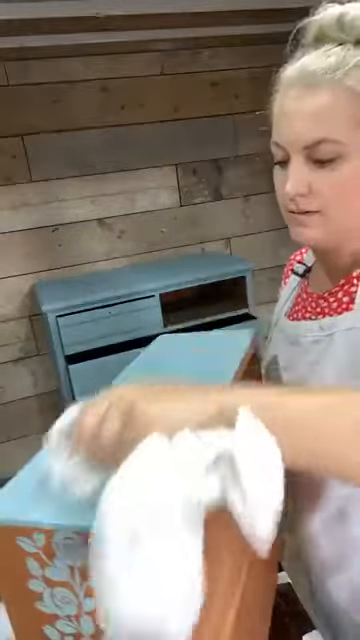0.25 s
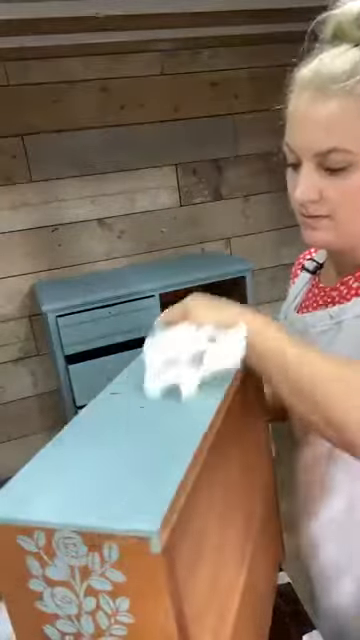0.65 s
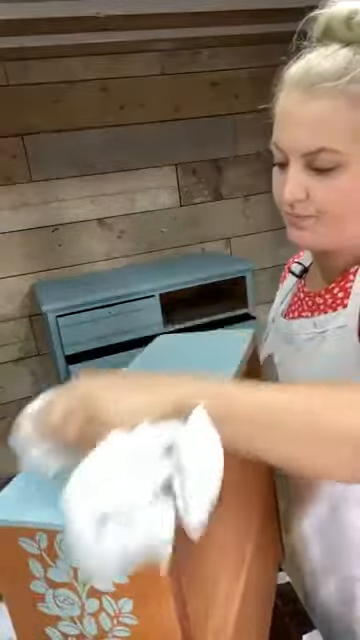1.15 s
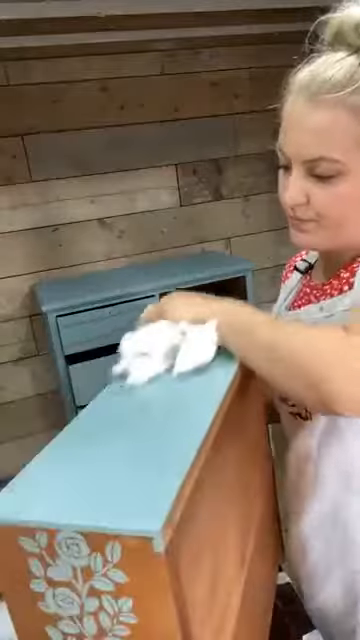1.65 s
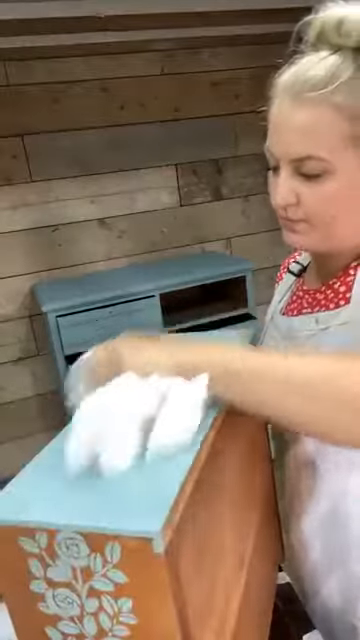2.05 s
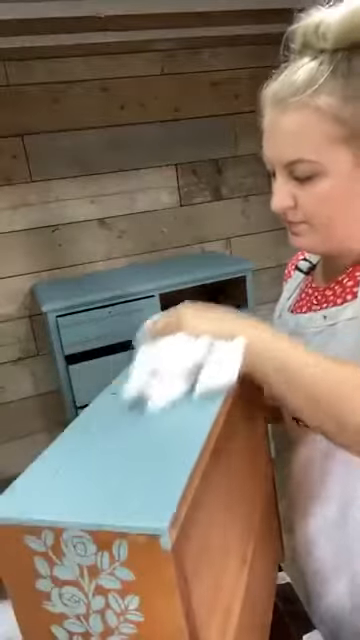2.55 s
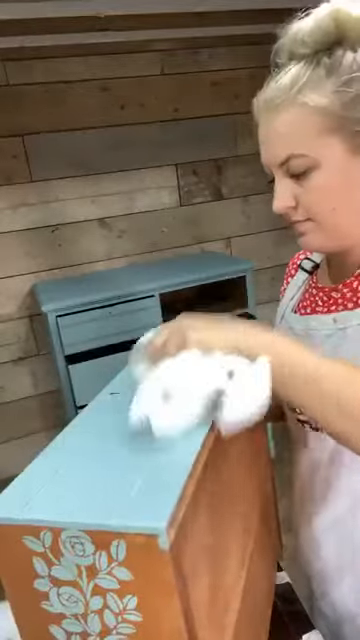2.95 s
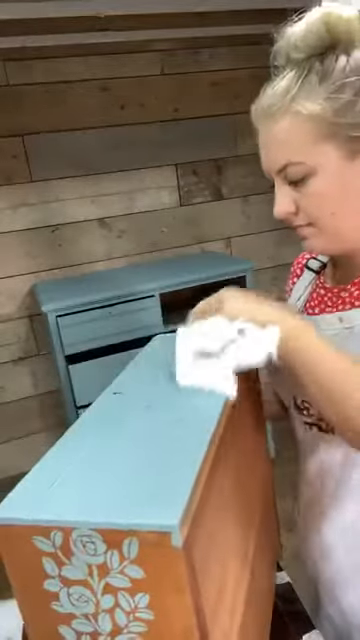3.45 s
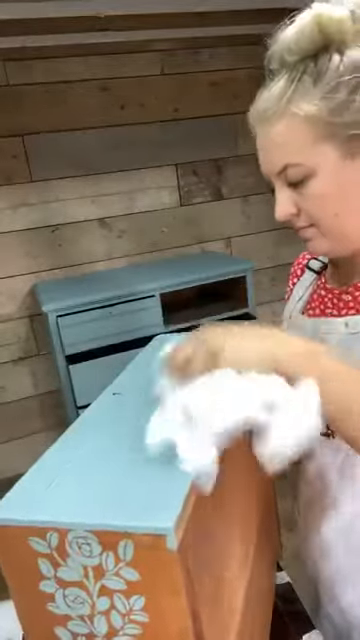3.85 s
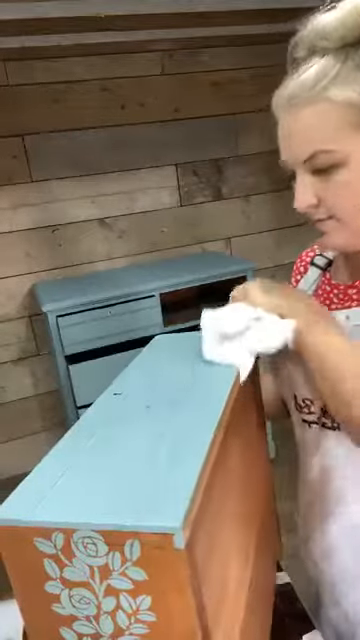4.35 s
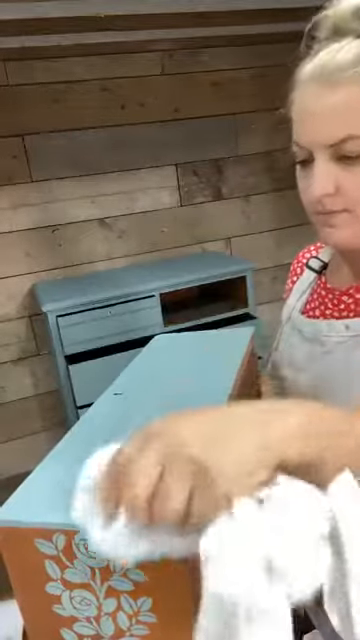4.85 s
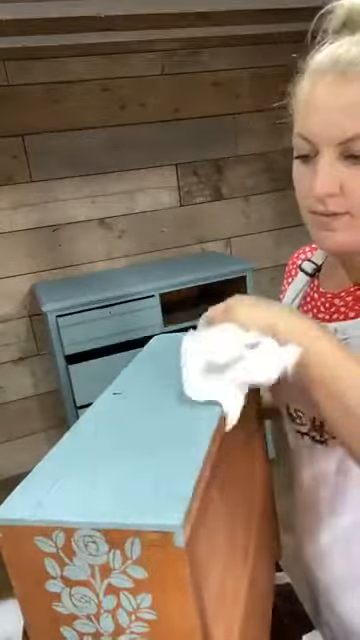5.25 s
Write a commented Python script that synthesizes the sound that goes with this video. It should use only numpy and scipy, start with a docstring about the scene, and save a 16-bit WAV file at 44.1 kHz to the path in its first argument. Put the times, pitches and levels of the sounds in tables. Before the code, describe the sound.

Dry, swishing strokes of a cloth buff a waxed piece of wooden furniture, two or three strokes a second, with a few tiny rasps and low groans. Hard pushes make the piece bump and knock roughly every second at first; later the knocks are barely there and a faint low rumble swells near the end. A single microphone picks it up in a small, quiet room.

```python
"""A cotton cloth is rubbed briskly to and fro over the waxed front of a wooden drawer on a table in a
small room. From the start the fibres hiss, coloured by the hollow under the hand, whose pitch rises and
sinks with each stroke. For four seconds, hard pushes rock the drawer about once a second: it thumps on
the table and drops back with a knock. Now and then the cloth snags or groans on the wax. After that the
knocks are faint, and near the end a low rumble swells. One microphone hears it all."""
import sys
import numpy as np
from scipy import signal
from scipy.fft import rfft, irfft
from scipy.io import wavfile
from scipy.ndimage import uniform_filter1d

SR = 44100
rng = np.random.default_rng(int(sys.argv[2]) if len(sys.argv) > 2 else 0)


def store_wav(level_fs):
    """Save 16-bit WAV to argv[1]."""
    pcm = np.round(np.clip(np.atleast_2d(level_fs), -1, 1) * 32767)
    wavfile.write(sys.argv[1], SR, pcm.T.astype(np.int16))


N = 242936
TIME = np.arange(N) / SR

# The hand's strokes, pull and push in turn. The crest is the highest pitch of the hollow under the hand.
# (moment of grip [s], speeding up [s], slowing down [s], hiss [dB], treble [dB], hand's weight [dB],
#  crest [Hz], time from the turn to the crest [s], hollow's strength at the crest [dB], grip [dB])
HAND_STROKES = [(0.02, 0.013, 0.21, -52.5, -2.5, 3, 3350, 0.14, 4, -49),
                (0.137, 0.29, 0.23, -44.5, -0.5, -1, 3470, 0.19, -2.5, -34),
                (.604, 0.072, 0.4, -43, 0, 3, 4120, 0.13, 1, -52.5),
                (1.074, 0.28, 0.22, -43.5, -0.5, 0, 3853, 0.19, -3, -47.5),
                (1.535, 0.086, 0.43, -44.2, 0.5, 0, 3700, 0.15, 1.5, -50.5),
                (2.05, 0.27, 0.26, -44.5, -2, 0, 3880, 0.2, -3.5, -57.5),
                (2.491, 0.13, 0.36, -43.5, 0, 1.5, 3870, 0.2, 1, -53),
                (2.963, 0.29, 0.17, -45, -1, -2.5, 3400, .21, -2, -39.5),
                (3.342, .11, 0.38, -44.5, 2, -0.5, 3300, 0.15, -2.5, -48),
                (3.823, 0.25, 0.17, -46.5, -2, -4, 3540, .21, -1, -41.5),
                (4.169, 0.091, .37, -46.5, 1, -4.5, 3200, .15, -2.5, -45),
                (4.615, 0.25, 0.34, -44.5, 0, -6.5, 4200, 0.2, -5, -57.5),
                (5.142, 0.14, 0.21, -44.5, 3, -1.5, 4220, 0.16, 0.5, -57),
                (5.469, 0.27, .19, -42.5, -2, -1.5, 3500, .18, -2, -65.5)]
# The tones that drawer and table ring with: (pitch [Hz], level [dB], time to fade by 60 dB [s])
WOOD_TONES = [(85.5, -17, 0.15), (147, -16, 0.11), (183.4, -8.5, 0.16), (240.4, 1.5, 0.093),
              (281.5, -5, 0.12), (310, -6.5, 0.072), (430, -18, 0.025), (490, -1.5, 0.043),
              (547.3, 5.5, 0.039), (632, -0.5, 0.053), (695, 5.5, 0.057), (804, -7.5, 0.022),
              (833, -10.5, 0.06), (1000, 4, 0.064), (1037, -12, 0.25), (1250, -1, 0.052),
              (1410, -4.5, 0.031), (1900, 4, 0.018), (2170, 3, 0.017), (2820, 3, 0.023)]


def strokes(stop_s=0.086, rest_db=-72, treble_fade_db_per_s=8, closing_db_per_s=12.5,
            hollow_rest_hz=926, hollow_rise_s=0.16, hollow_sink_s=0.1454):
    """The hand swings to and fro, setting the cloth's loudness and tone at every sample."""
    # How steeply the hiss follows the hand's speed, for a pull and then a push:
    # (time from the turn to the grip [s], exponent while speeding up, exponent while slowing down)
    swings = [(.029, 2.37, 1.38), (.038, 1.115, 2.86)]
    total_power, tone_sum = 1e-16, 0
    for k, stroke in enumerate(HAND_STROKES):
        grip_s, rise_s, fall_s, hiss_db, treble_db, weight_db, crest_hz, crest_s, hollow_db, _ = stroke
        grip_lag_s, speeding, slowing = swings[k % 2]
        length_s = rise_s + fall_s
        age = np.clip(TIME - grip_s + grip_lag_s, 0, length_s)
        sliding = np.clip((length_s - age) / stop_s, 0, 1)   # the cloth sticks fast at the end
        speed = np.sin(np.pi / 2 * np.interp(age, [0, rise_s, length_s], [0, 1, 0]))
        power = (from_db(hiss_db) * sliding * speed ** np.where(age < rise_s, speeding, slowing)) ** 2
        past_crest = age - crest_s
        glide_s = np.where(past_crest < 0, hollow_rise_s, hollow_sink_s)
        lift_hz = (crest_hz - hollow_rest_hz) * np.exp(-(past_crest / glide_s) ** 2)
        treble_db = treble_db - treble_fade_db_per_s * past_crest
        hollow_db = hollow_db + closing_db_per_s * past_crest   # the hollow closes along the stroke
        # where two strokes overlap, the louder one sets the tone
        tone_sum = tone_sum + power * np.array([treble_db, np.full(N, weight_db), lift_hz, hollow_db])
        total_power = total_power + power
    total_power = total_power + from_db(rest_db) ** 2
    treble_db, weight_db, lift_hz, hollow_db = tone_sum / total_power
    return 10 * np.log10(total_power), treble_db, weight_db, hollow_rest_hz + lift_hz, hollow_db


def cloth_hiss(hiss_db, treble_db, weight_db, hollow_hz, hollow_db, patchy_db=1.43, weave_db=0.42):
    """Countless fibres slip and hiss, duller as the hand slows; the hollow under the hand rings along."""
    # The tone of rubbing fibres: (frequency [Hz], level [dB])
    fibre_spectrum = [(120, -35.5), (350, -24), (700, -6), (1300, -3.5), (2200, -1.5), (4000, 0),
                      (6000, -2.5), (7700, -3), (8300, -7), (11000, -8.5), (13500, -26), (15000, -5)]
    darkening_db = 0.96 * np.clip(hiss_db.max() - hiss_db, 0, 12)
    hiss = 0
    for hz, band in noise_bands(100, size=N):
        low_share = np.clip(np.log2(3500 / hz) / 2, 0, 1)
        high_share = np.clip(np.log2(hz / 5500), 0, 1)
        colour_db = low_share * (darkening_db + weight_db) + high_share * treble_db
        hiss = hiss + band * from_db(at_hz(fibre_spectrum, hz) + colour_db + patchy_db * drift(10.4))
    hiss = hiss + hand_hollow(hollow_hz, hollow_db)
    # even out the bright part of the hiss, so that the stroke sets its loudness
    bright_power = uniform_filter1d(butter(hiss, [3000, 8000], "band") ** 2, size=4410)
    hiss = hiss / np.sqrt(bright_power)
    return hiss * from_db(hiss_db + weave_db * drift(150))   # the weave catches and lets go


def hand_hollow(pitch_hz, strength_db, boost_db=3.0, wobble=0.023):
    """The hollow under the hand rings with noise, louder and purer the better it is closed."""
    sharpness = 4.5 * np.sqrt(from_db(strength_db))
    noise = rng.standard_normal(N)
    wavering_hz = pitch_hz * np.exp(wobble * drift(10))
    return moving_resonance(noise, wavering_hz, sharpness) * from_db(boost_db + strength_db)


def contacts(usual_db=-47.5, usual_hz=460, usual_scuff_s=0.033, knock_scuff_s=0.0014):
    """List each grip of the hand and knock of the drawer as (time, level, brightness, scuff time)."""
    # The drawer bumps on the table: (time [s], level [dB], brightness [Hz])
    drawer_knocks = [(0.157, -38, 220), (0.195, -32.5, 1560), (1.114, -55, 250), (1.1375, -30.5, 2340),
                     (2.0899, -34.5, 2030), (2.979, -39.5, 220), (3.0211, -33, 970), (3.845, -32.5, 239),
                     (3.889, -37, 597), (4.674, -54, 1900), (5.212, -49.5, 280)]
    grips = []
    for s, *_, db in HAND_STROKES:
        harder_db = db - usual_db   # a harder grip is duller and shorter
        grips.append((s, db, usual_hz / 2 ** (harder_db / 14.5), usual_scuff_s / 2 ** (harder_db / 5)))
    return grips + [(s, db, hz, knock_scuff_s) for s, db, hz in drawer_knocks]


def wood_knocks(vary_db=0.5, detune=0.01, flip_chance=0.08, scuff_db=-28, size=22050):
    """Each blow is a click and a short scuff that ring the wood; the brighter the blow, the more of the high
    tones it wakes."""
    out = np.zeros(N + size)
    attack = TIME[:size] < 0.025   # a blow's level is that of its first moments
    for s, blow_db, contact_hz, scuff_s in contacts():
        scuff = from_db(scuff_db) * rng.standard_normal(size) * np.exp(-TIME[:size] / scuff_s)
        force = cross_panel(butter(signal.unit_impulse(size) + scuff, contact_hz, "low"))
        blow = np.zeros(size)
        for hz, db, fade_s in WOOD_TONES:
            # the spot that is hit sets each tone's strength and sign; the hand's load shifts its pitch
            strength = from_db(db + vary_db * rng.standard_normal())
            sign = np.sign(rng.random() - flip_chance)
            pitch_hz = hz * np.exp(detune * rng.standard_normal())
            blow += sign * strength * ring(force, pitch_hz, fade_s)
        start = round(s * SR)
        out[start:start + size] += from_db(blow_db) * blow / np.std(blow[attack])
    return out[:N]


def cross_panel(force, bass_delay_s=0.00892, corner_hz=380):
    """Low bending waves cross a wooden panel more slowly than high ones."""
    hz = np.arange(len(force) // 2 + 1) * SR / len(force)
    phase = 2 * np.pi * bass_delay_s * corner_hz * np.arctan(hz / corner_hz)
    return irfft(rfft(force) * np.exp(-1j * phase), len(force))


def wood_murmur(drag_db, offset_db=-17, contact_hz=550, uneven_db=2.5):
    """The dragging cloth keeps the drawer's low tones faintly ringing."""
    drag = butter(rng.standard_normal(N), contact_hz, "low", order=1)
    wood = sum(from_db(db) * ring(drag, hz, fade_s) for hz, db, fade_s in WOOD_TONES)
    return rms_one(wood) * from_db(drag_db + offset_db + uneven_db * drift(4.2))


def wax_groans(jitter=0.033, uneven_db=5.5, overtone_db=-14):
    """The cloth sticks and slips on the wax at a nearly steady rate, making brief low groans."""
    # Spells of sticking and slipping: (time [s], half length [s], slip rate [Hz], level [dB])
    groans = [(1.243, 0.013, 309, -42.5), (1.68, 0.037, 315, -54.5), (2.246, 0.057, 322, -58),
              (3.461, 0.045, 297.5, -56.5)]
    out = np.zeros(N)
    wander = np.exp(jitter * drift(31.7))
    for s, half_length_s, hz, db in groans:
        phase = 2 * np.pi * np.cumsum(hz * wander) / SR
        tone = np.sin(phase) + from_db(overtone_db) * np.sin(2 * phase)
        out += from_db(db) * swell(s, half_length_s) * tone
    return np.sqrt(2) * out * from_db(uneven_db * drift(60))


def cloth_snags(band_ratio=1.58):
    """A fold of the cloth snags with a short rasp of noise."""
    # The rasps: (time [s], half length [s], centre frequency [Hz], level [dB])
    snags = [(0.171, 0.013, 3220, -45.5), (2.072, 0.007, 1700, -48), (4.633, 0.017, 950, -50),
             (5.204, .018, 900, -54)]
    noise = rng.standard_normal(N)
    out = np.zeros(N)
    for s, half_length_s, hz, db in snags:
        rasp = rms_one(butter(noise, [hz / band_ratio, hz * band_ratio], "band"))
        out += from_db(db) * swell(s, half_length_s) * rasp
    return out


def room_echo(sound, first_echo_s=0.0057, size=22050):
    """The room returns a blur of echoes that die sooner in the treble."""
    # How long the room rings: (frequency [Hz], time to fade by 60 dB [s])
    fade_times = [(100, 0.59), (300, 0.32), (1000, 0.26), (3000, 0.25), (12000, 0.15)]
    t = TIME[:size]
    tail = sum(band * from_db(-60 * t / at_hz(fade_times, hz)) for hz, band in noise_bands(50, size))
    tail = tail * np.clip(t / first_echo_s - 1, 0, 1)
    return signal.fftconvolve(sound, tail / np.sqrt(np.sum(tail ** 2)))[:N]


def background(air_db=-65.5, rumble_db=-69.5, rumble_band_hz=(50, 95)):
    """Quiet room air and the table's low rumble."""
    # The tone of the still room: (frequency [Hz], level [dB])
    air_spectrum = [(25, -25), (45, -18), (70, -11), (120, -7), (250, -1), (700, -5.5), (1500, -57),
                    (4000, -18), (9000, -29), (15000, -46)]
    # Moments when the rumble grows: (time [s], half length [s], level [dB])
    rumble_swells = [(4.95, 0.03, -62.5), (5.36, .17, -65)]
    air = rms_one(sum(band * from_db(at_hz(air_spectrum, hz)) for hz, band in noise_bands(20, size=N)))
    rumble = rms_one(butter(rng.standard_normal(N), rumble_band_hz, "band"))
    swelling = sum(from_db(db) * swell(s, half_length_s) for s, half_length_s, db in rumble_swells)
    return from_db(air_db) * air + (from_db(rumble_db) + swelling) * rumble


def from_db(db):
    """Turn decibels into a number to multiply by."""
    return 10 ** (np.asarray(db) / 20)


def rms_one(x):
    """Scale a signal so that its average level (rms) is 1."""
    return x / np.sqrt(np.mean(x ** 2) + 1e-20)


def at_hz(points, hz):
    """Read between the rows of a (frequency, value) table, with octaves evenly spaced."""
    frequencies, values = np.array(points).T
    return np.interp(np.log(hz), np.log(frequencies), values)


def butter(x, hz, kind, order=2):
    """A Butterworth filter: keep the lows, the highs or a band."""
    return signal.sosfilt(signal.butter(order, np.clip(hz, 10, .45 * SR), kind, fs=SR, output="sos"), x)


def drift(rate_hz):
    """A smooth random wander, typically about 1 in size."""
    r = np.exp(-80 * np.pi * rate_hz / SR)
    slow = signal.lfilter([1], [1, -2 * r, r * r], rng.standard_normal(N // 40 + 2002))[2000:]
    return np.interp(np.arange(N) / 40, np.arange(len(slow)), rms_one(slow))


def swell(s, half_length_s):
    """A bell-shaped rise and fall around a moment."""
    return np.exp(-((TIME - s) / half_length_s) ** 2)


def noise_bands(low_hz, size):
    """Noise in slices a third of an octave wide, as (centre Hz, band); neighbours are unrelated."""
    edges = 16000 / 2 ** (np.arange(28, -1, -1) / 3)
    white = rng.standard_normal((2, size))
    return [(np.sqrt(low * high), butter(white[k % 2], [low, high], "band"))
            for k, (low, high) in enumerate(zip(edges, edges[1:])) if high > low_hz]


def ring(force, hz, fade_s):
    """A force sets one tone ringing, which dies away by 60 dB in fade_s."""
    r = from_db(-60 / (fade_s * SR))
    w = 2 * np.pi * hz / SR
    return signal.lfilter([.5, 0, -.5], [1, -2 * r * np.cos(w), r * r], force + 1e-18)


def moving_resonance(x, centre_hz, sharpness, size=128):
    """Keep a band of the sound whose centre and sharpness glide."""
    out, state = np.zeros(N), np.zeros(2)
    for i in range(0, N, size):
        w = 2 * np.pi * centre_hz[i] / SR
        r = np.exp(-w / (2 * sharpness[i]))
        forward = np.array([1, 0, -1]) * (1 - r * r) / 2
        feedback = [1, -2 * r * np.cos(w), r * r]
        out[i:i + size], state = signal.lfilter(forward, feedback, x[i:i + size], zi=state)
    return out


def scene(knock_echo_db=-10, cloth_echo_db=-16):
    """Cloth and wood in the room, the same in both channels."""
    hiss_db, treble_db, weight_db, hollow_hz, hollow_db = strokes()
    hiss = cloth_hiss(hiss_db, treble_db, weight_db, hollow_hz, hollow_db)
    rubbing = hiss + wood_murmur(hiss_db + weight_db) + wax_groans() + cloth_snags()
    knocks = wood_knocks()
    echo = room_echo(from_db(knock_echo_db) * knocks + from_db(cloth_echo_db) * rubbing)
    mono = rubbing + knocks + echo + background()
    return np.stack([mono, mono])


def record(dry, bass_cut_hz=40, treble_cut_hz=14300):
    """The microphone loses the deep bass; the highest treble is cut off."""
    treble_cut = signal.ellip(10, .1, 80, treble_cut_hz, fs=SR, output="sos")
    return signal.sosfilt(treble_cut, butter(dry, bass_cut_hz, "high"))


dry = scene()
out = record(dry)
store_wav(out)
```